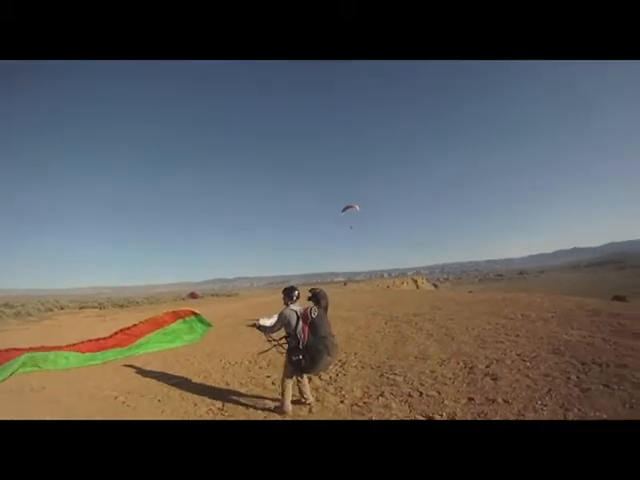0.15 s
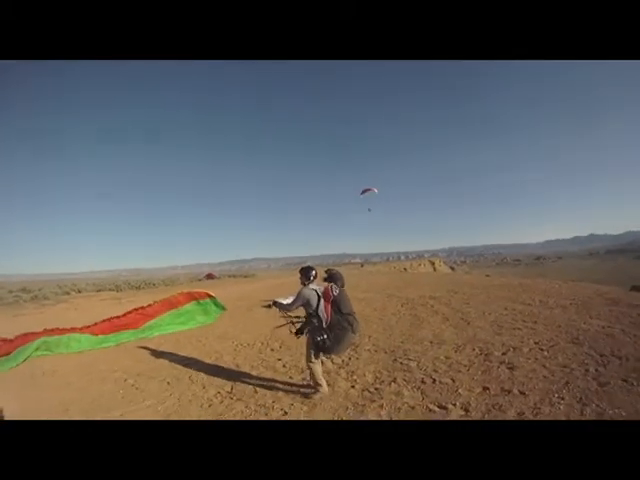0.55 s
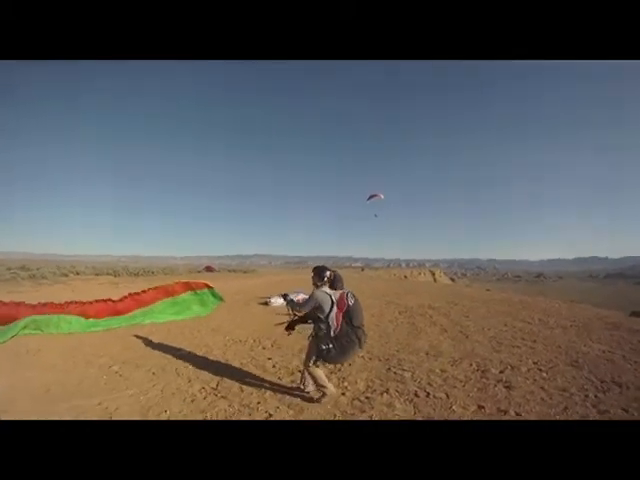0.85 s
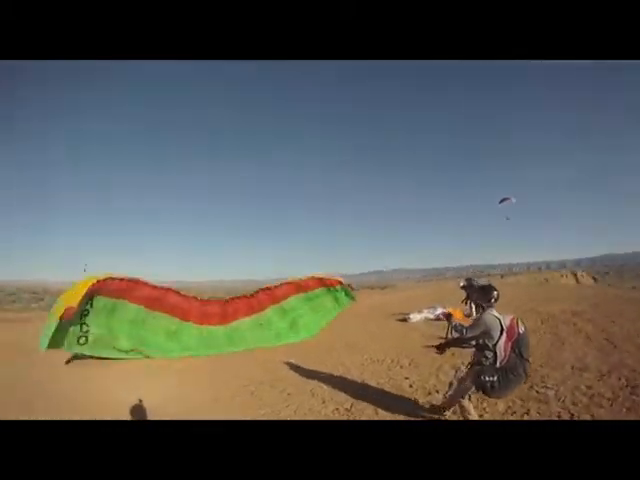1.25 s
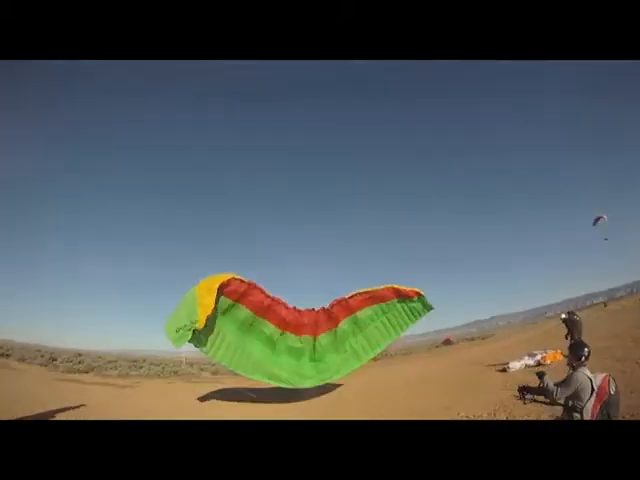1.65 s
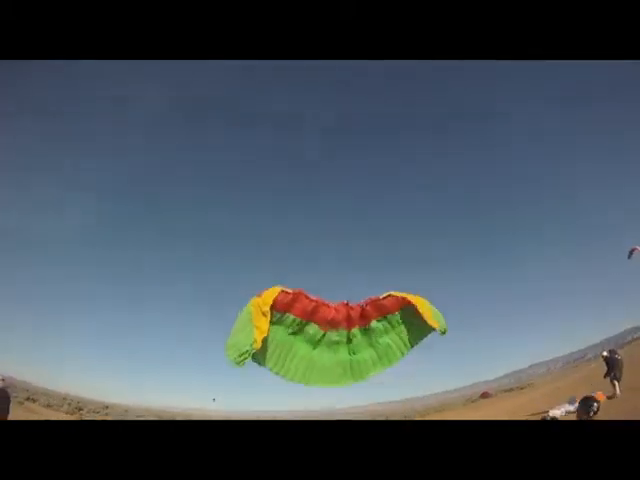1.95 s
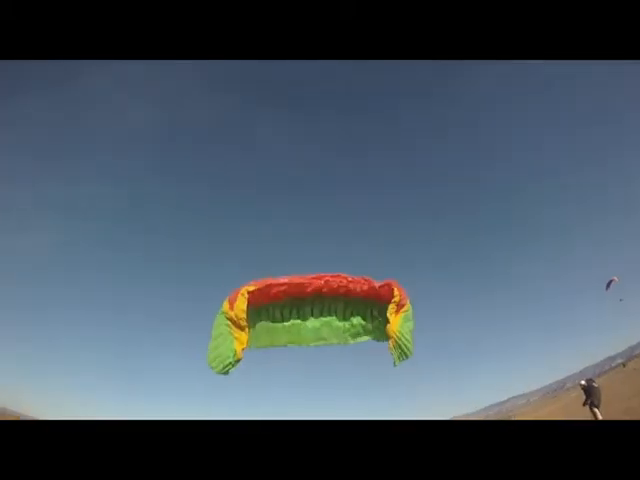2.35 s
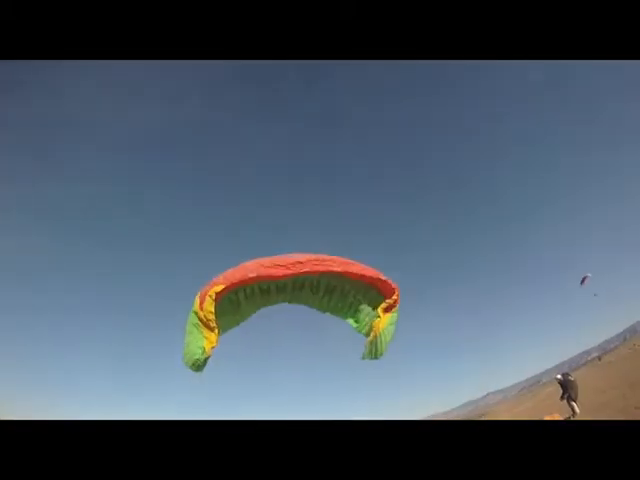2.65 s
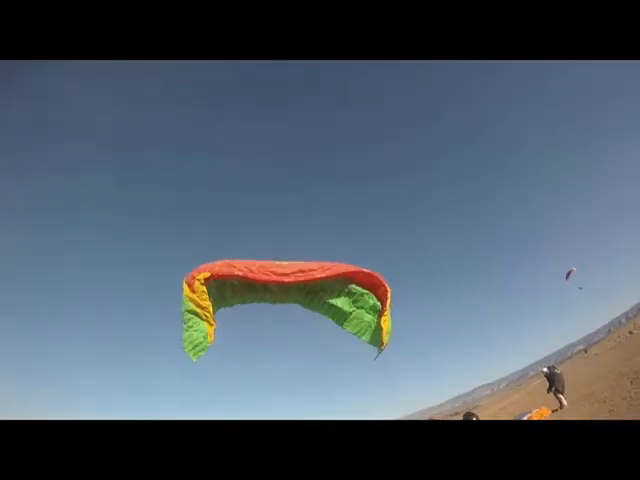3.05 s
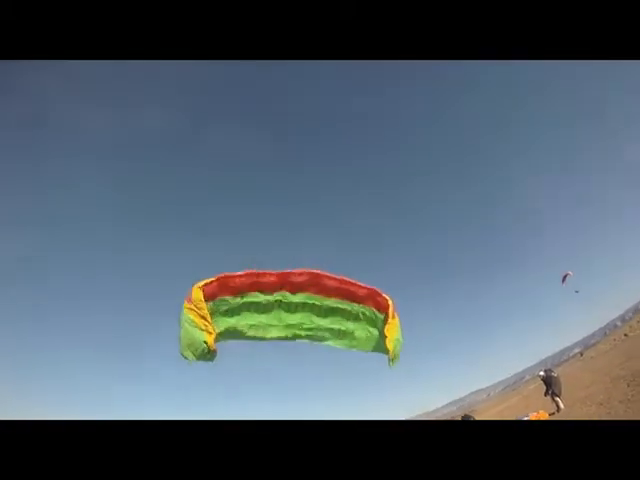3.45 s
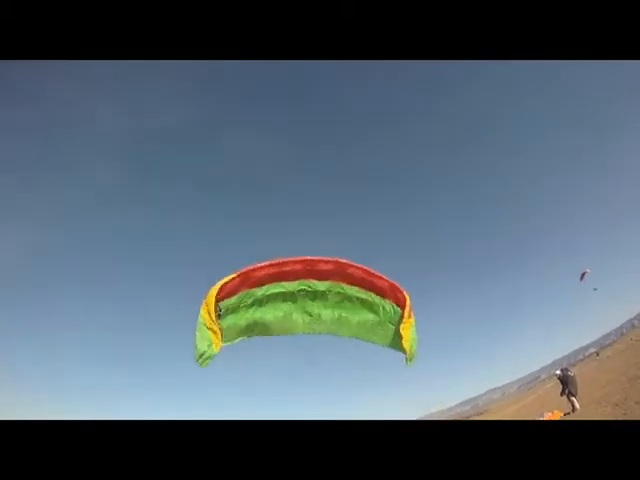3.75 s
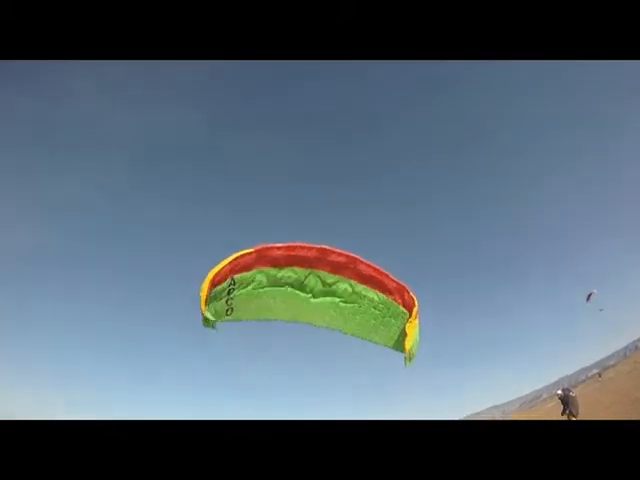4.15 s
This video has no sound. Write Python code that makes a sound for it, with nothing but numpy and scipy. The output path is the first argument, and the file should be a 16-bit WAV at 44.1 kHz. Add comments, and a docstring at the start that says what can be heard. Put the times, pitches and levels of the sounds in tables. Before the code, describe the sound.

Wind rumbles low against an enclosed camera as paraglider cloth drags, snaps and rustles upward, with one very loud hard knock midway.

```python
"""Raising a paraglider wing in strong wind

Wind on a ridge, heard by a camera in a closed plastic housing: lumpy turbulent noise presses on the housing
and low noise bursts shake its mount. Cloth drags, fills and rustles as random clicks mixed with hiss; snaps are
bright noise bursts. One hard blow is a sum of decaying partials. Peaks and dips give a muffled, ringing colour."""
import sys
import numpy as np
from scipy.fft import rfft, irfft, next_fast_len
from scipy.io import wavfile
from scipy.ndimage import map_coordinates

SR = 44100
rng = np.random.default_rng(int(sys.argv[2]) if len(sys.argv) > 2 else 0)


def unload_wav(signal):
    """Save mono or channel-first audio to the path in sys.argv[1] as 16-bit WAV at rate SR, clipped to [-1, 1]."""
    wavfile.write(
        sys.argv[1],
        SR,
        np.round(np.clip(np.atleast_2d(signal).T, -1, 1) * 32767).astype(np.int16),
    )


N = 189786  # samples


def amp(db):
    """Level law: decibels to amplitude gain."""
    return 10 ** (np.asarray(db) / 20)


def unit(x):
    """Normalisation: x scaled to rms 1."""
    return x / np.sqrt(np.mean(x ** 2) + 1e-20)


def clock():
    """Sampling: the time of each sample, in seconds."""
    return np.arange(N) / SR


def white():
    """White noise: independent Gaussian samples, with equal power at all frequencies."""
    return rng.standard_normal(N)


def level_curve(rows):
    """Linear interpolation of (t/s, level/dB) rows to one level per sample."""
    times, levels = np.transpose(rows)
    return np.interp(clock(), times, levels)


def wobble(rate):
    """Slow random modulation: a smooth curve through rate random knots a second."""
    knots = rng.standard_normal(4096)
    return map_coordinates(knots, [clock() * rate], mode="wrap")


def filtered(x, gain):
    """Linear filtering: the spectrum of x times a gain that depends on frequency."""
    padded = next_fast_len(N + 8192)  # room for the filter to ring
    spectrum = rfft(x, padded) * gain(np.fft.rfftfreq(padded, 1 / SR))
    return irfft(spectrum, padded)[:N]


def coloured(x, spectrum):
    """Spectral shaping: x through (f/Hz, level/dB) points on a log axis, at rms 1."""
    f, db = np.transpose(spectrum)
    return unit(filtered(x, lambda hz: amp(np.interp(np.log(hz + 1), np.log(f), db))))


def bell(x, centre, half_width):
    """Gaussian hump of height 1 that has fallen to a half at half_width."""
    return .5 ** (((x - centre) / half_width) ** 2)


def peaked(x, peaks):
    """Peak filtering: x through bell-shaped peaks and dips whose decibels add."""
    return filtered(x, lambda hz: amp(sum(db * bell(hz, centre, width / 2) for centre, width, db in peaks)))


def burst(s, db, half, centre_hz, octaves, peaks=()):
    """Gated noise: a band that swells and fades around time s, with rms level db at its height."""
    half_band = octaves / 2 + 0.044  # octaves; widened slightly
    band = filtered(white(), lambda hz: bell(np.log2(hz + 1), np.log2(centre_hz), half_band))
    swell = bell(clock(), s, half)
    swell_rms = np.sqrt(np.mean(swell ** 2))
    return amp(db) * swell_rms * unit(swell * peaked(band, peaks))


# peaks and dips of the muffled, ringing camera sound, from housing and recorder together:
# f/Hz, width/Hz, level/dB
CAMERA_COLOUR = [(1184, 142, 8), (1380, 87, -7), (1600, 250, 3.5), (2154, 400, 11.5), (3030, 180, 2),
                 (3523, 260, 6), (4093, 254, 7), (4560, 250, -3.5), (5160, 360, -2), (5990, 586, -22),
                 (7500, 310, -7), (8260, 160, -7), (8400, 180, 3.5), (9820, 420, 11.5), (10700, 140, -8),
                 (10740, 150, 9.5), (11630, 860, -30), (12840, 570, -18), (13300, 130, 6),
                 (13600, 140, -17), (14270, 480, 11), (15000, 440, 1.5)]


def through_camera(x):
    """Transfer response: housing and recorder together colour airborne sound with peaks and dips."""
    return peaked(x, CAMERA_COLOUR)


# buffeting, which eases once the wing is up: t/s, level/dB before the lumps
BUFFET_LEVEL = [(0, -49.5), (.45, -46), (1, -46.5), (1.25, -53), (1.5, -47), (1.95, -46), (2.1, -52.5),
                (2.95, -55), (3.3, -52), (4.3, -55.5)]
# spectrum of the pressure on the housing: f/Hz, relative level/dB
RUMBLE_SPECTRUM = [(8, -2), (20, 2.5), (35, -1), (62, -1.5), (85, -9), (103, 1.5), (125, -17), (180, -24),
                   (300, -28.5), (600, -41.5), (1500, -30.5), (4000, -94)]
# spectrum applied to the air rush after the camera colour: f/Hz, relative level/dB
AIR_SPECTRUM = [(60, 14), (250, 1.5), (600, -2.5), (900, -5.5), (1500, -6), (3000, -11.5), (5000, -22.5),
                (9000, -20), (12000, -20), (16000, -24)]
LUMP_DB, LUMPS_PER_S = 1.5, 18  # depth and pace of the turbulence


def wind():
    """Turbulent pressure noise: lumps press on the housing; air rushes almost steadily over the ridge."""
    buffet_db = level_curve(BUFFET_LEVEL) + LUMP_DB * wobble(rate=LUMPS_PER_S)
    buffet = amp(buffet_db) * coloured(white(), RUMBLE_SPECTRUM)
    sway_db = .7 * wobble(rate=9)
    air = amp(-58.0 + sway_db) * coloured(through_camera(white()), AIR_SPECTRUM)
    return buffet + air


# single eddies and shudders of the mount:
# t/s, level/dB, half length/s, centre f/Hz, width/octaves (before burst widens it)
SHUDDER_BURSTS = [(0.844, -34, 0.057, 24, 0.93), (1.058, -46, .03, 104, 0.17),
                  (1.11, -56, 0.061, 199, 0.58), (1.706, -39.5, 0.018, 41, 1),
                  (1.793, -46, 0.045, 104, 0.14), (3.277, -43, 0.022, 51.7, 0.85),
                  (3.428, -50, 0.01, 218, .55)]


def shudders():
    """Narrow-band excitation: strong eddies rock the camera in brief, uneven oscillations."""
    return sum(burst(*row) for row in SHUDDER_BURSTS)


# the blow on the housing: t/s, level/dB
BLOW = (2.0121, 0)
# ringing partials of the blow as heard through the camera: f/Hz, level/dB relative to the blow, t60/s
BLOW_PARTIALS = [(88.5, -45, 0.18), (660, -27, 0.027), (900, -30.5, 0.074), (1174, -5.5, 0.02),
                 (1610, -12, 0.0098), (1760, -19.5, 0.039), (1986, -2, 0.0085), (2194, 2.5, 0.011),
                 (2880, -18, 0.021), (3170, -11.5, 0.013), (3580, -13, 0.016), (4116, -0.5, 0.0091),
                 (4550, -7.5, 0.0089), (4930, -9.5, 0.0083), (7010, -14, 0.0091), (7470, -12.5, 0.01),
                 (7900, -7, 0.01), (8450, -27, 0.015), (8900, -22, 0.018), (9870, -10.5, .011),
                 (10800, -26, 0.024), (13100, -27, .017), (14030, -13, .011), (14900, -31, .013)]
# spectrum of the rough crack: f/Hz, relative level/dB
CRACK_SPECTRUM = [(200, -14), (800, -7), (3000, 4), (6000, -4), (10000, -11), (12000, -25), (15000, -14)]
# spectrum applied to the tail after the camera colour: f/Hz, relative level/dB
TAIL_SPECTRUM = [(200, -16), (750, 3), (1500, -2), (2200, -11), (5000, -31), (10000, -17), (15000, -18)]


def knock(attack=0.00072, crack_db=-19, crack_t60=0.013, tail_db=-38, tail_t60=0.074,
          push_db=-8.5, push_time=0.0016):
    """Additive impact synthesis: a blow shoves the camera; decaying partials join a crack and a faint tail."""
    # times in s; levels in dB relative to the blow
    s, db = BLOW
    t = np.maximum(clock() - s, 0)
    ring = np.zeros(N)
    for k, (hz, level, t60) in enumerate(BLOW_PARTIALS):
        sign = (-1) ** k  # neighbouring partials start in opposite directions
        ring += sign * amp(level - 60 * t / t60) * np.sin(2 * np.pi * hz * t)
    crack = amp(crack_db - 60 * t / crack_t60) * coloured(white(), CRACK_SPECTRUM)
    tail = amp(tail_db - 60 * t / tail_t60) * coloured(through_camera(white()), TAIL_SPECTRUM)
    # the air shut in the housing is squeezed once and springs back
    u = t / push_time
    push = amp(push_db) * (1 - u) * np.exp(-u) * (1 - np.exp(-t / .0001))
    onset = 1 - np.exp(-t / attack)
    return amp(db) * (onset * (ring + crack + tail) - push)


def creases(rate, spread_db, smooth):
    """Random impulse noise: clicks of buckling cloth, rate a second, on the smooth hiss of sliding cloth."""
    struck = rng.random(N) < rate / SR
    size = amp(spread_db * rng.uniform(-1, 1, N))
    clicks = struck * white() * size
    return unit(unit(clicks) + smooth * white())


# two-band colour of the sliding hiss as heard, applied after the camera colour: f/Hz, relative level/dB
DRAG_COLOUR = [(1500, -7), (3500, -1), (4200, -8), (4750, 7), (5500, -13), (6500, -11), (7400, 1.5),
               (8300, -6.5), (10000, -17), (15000, -16)]


def drag(at=1.27, half_length=0.23, db=-56):
    """Friction noise: the cloth slides over the dirt just before it leaves the ground."""
    hiss = coloured(through_camera(creases(rate=2800, spread_db=4, smooth=1.9)), DRAG_COLOUR)
    return amp(db) * bell(clock(), at, half_length) * hiss


# cloth and lines snapping taut:
# t/s, level/dB, half length/s, centre f/Hz, width/octaves (before burst widens it)
SNAP_BURSTS = [(.0635, -46, 0.001, 3550, 0.57), (.0635, -53.5, 0.0017, 7700, 1.1),
               (0.9478, -48, 0.0013, 4200, 2), (0.9513, -41.5, 0.0011, 4700, 2.3),
               (0.958, -47, 0.0033, 3350, 2.1), (1.544, -45.5, 0.0048, 1700, 3.8),
               (1.607, -43.5, 0.0026, 4400, 2.2), (1.613, -32, 0.0009, 4200, 3),
               (1.6161, -33.5, 0.0009, 3800, 2.6), (3.564, -54, .006, 3000, 2)]
# peaks and dips that colour each snap as heard through the camera: f/Hz, width/Hz, level/dB
SNAP_COLOUR = [(2090, 1700, 8), (3580, 190, 12.5), (6000, 300, -14), (8600, 430, 6.5), (9830, 400, 2),
               (11900, 2500, -18), (14800, 1500, 8)]


def snaps():
    """Impulsive release of tension: each snap is a brief, bright rasp of noise coloured by peaks and dips."""
    return sum(burst(*row, peaks=SNAP_COLOUR) for row in SNAP_BURSTS)


# the canopy fills, rises, and surges once more overhead: t/s, rustle level/dB before flutter
RUSTLE_LEVEL = [(0, -68), (.4, -63.5), (1.02, -60.5), (1.24, -54), (1.37, -55.5), (1.5, -48.5),
                (1.62, -52.5), (2.05, -52.5), (2.53, -52.5), (2.7, -50.5), (3, -55.5), (3.27, -55),
                (3.55, -49.5), (3.66, -56), (3.82, -55.5), (4.02, -58.5), (4.2, -54), (4.3, -56)]
# spectrum applied to the body of the rustle after the camera colour: f/Hz, relative level/dB
RUSTLE_SPECTRUM = [(150, -36), (450, -11), (800, -7), (1300, -1.5), (1800, -1), (2800, 2.5), (4000, -7),
                   (5500, -10.5), (8000, -24), (15000, -45)]
# spectrum applied to the small creases after the camera colour: f/Hz, relative level/dB
CRISP_SPECTRUM = [(1500, -55), (3500, -13.5), (5000, 5), (7000, 1), (9000, 1), (10500, -8), (13500, -7),
                  (16000, -5.5)]
FLUTTER_DB, FLUTTERS_PER_S = 0.72, 22  # depth and pace of the cloth's flutter
CRISP_DB, CRISP_GROWS = -7.5, 1.12  # creases against the mean rustle level; ratio of their dB swings


def wing():
    """Crumpling noise: the canopy rustles as it fills; harder motion adds more crisp top from small creases."""
    rustle_db = level_curve(RUSTLE_LEVEL)
    usual_db = rustle_db.mean()
    crisp_db = usual_db + CRISP_DB + CRISP_GROWS * (rustle_db - usual_db)
    flutter = amp(FLUTTER_DB * wobble(rate=FLUTTERS_PER_S))
    body = coloured(through_camera(creases(rate=2500, spread_db=6, smooth=1.9)), RUSTLE_SPECTRUM)
    top = coloured(through_camera(creases(rate=3500, spread_db=0.5, smooth=1.37)), CRISP_SPECTRUM)
    return flutter * (amp(rustle_db) * body + amp(crisp_db) * top)


def scene():
    """Superposition: wind, blow and wing add at one microphone."""
    return (wind() + shudders() + knock() + drag() + snaps() + wing())[None]


TOP_HZ = 15400  # band limit


def record(dry, top=1.0, hiss_db=-76):
    """Saturation and band limiting: the input adds faint hiss, rounds high peaks and cuts steeply at TOP_HZ."""
    x = dry[0] + amp(hiss_db) * white()
    rounded = x / (1 + (x / top) ** 4) ** (1 / 4)
    return filtered(rounded, lambda hz: 1 / np.sqrt(1 + (hz / TOP_HZ) ** 300))[None]


dry = scene()
out = record(dry)
unload_wav(out)
```